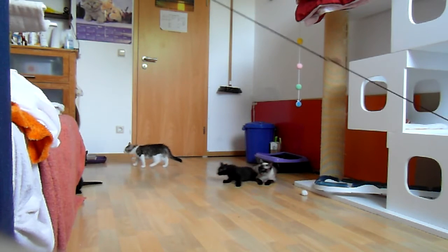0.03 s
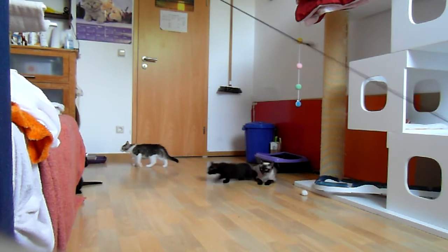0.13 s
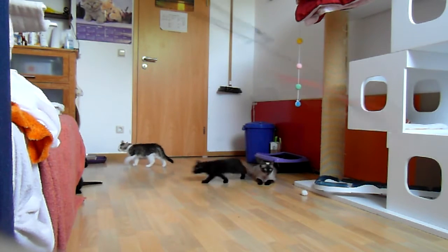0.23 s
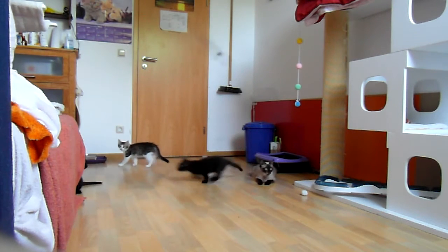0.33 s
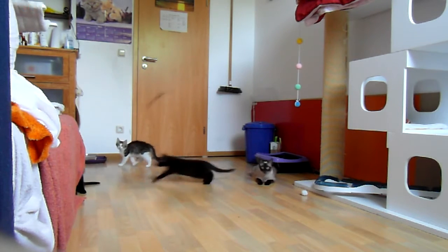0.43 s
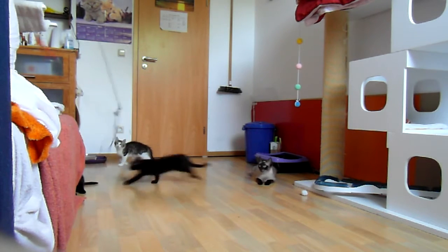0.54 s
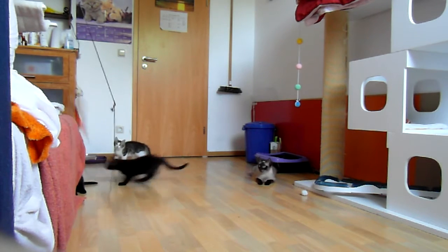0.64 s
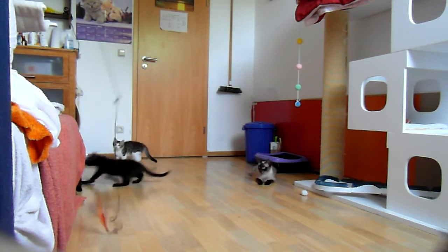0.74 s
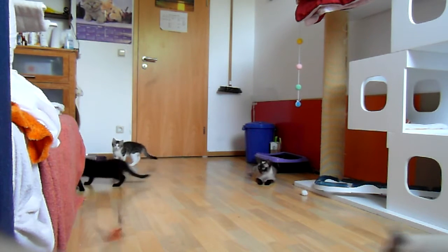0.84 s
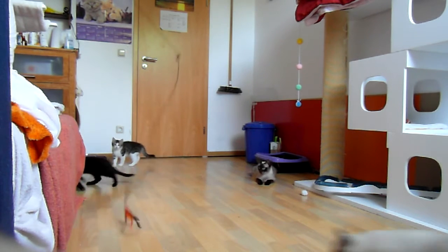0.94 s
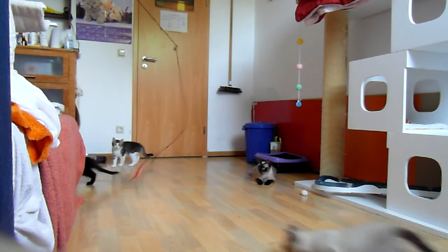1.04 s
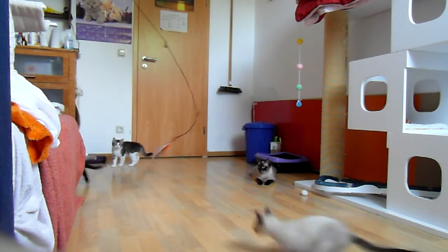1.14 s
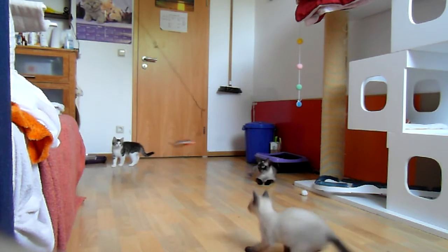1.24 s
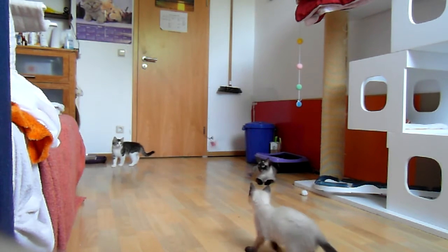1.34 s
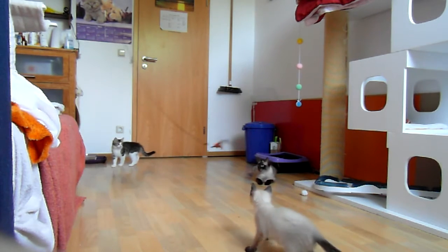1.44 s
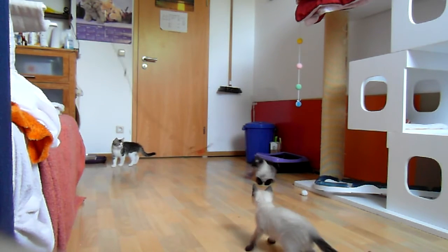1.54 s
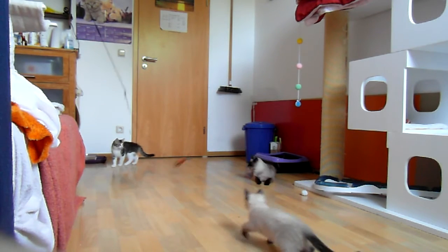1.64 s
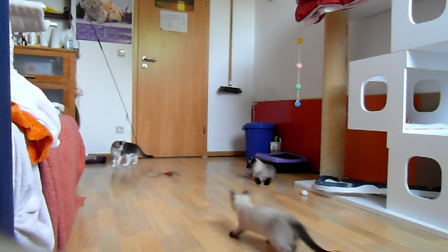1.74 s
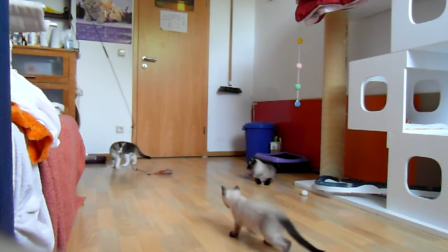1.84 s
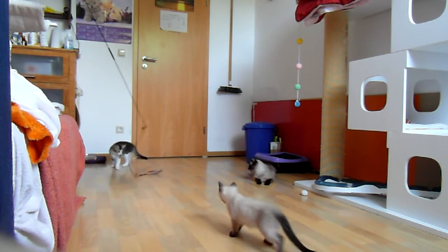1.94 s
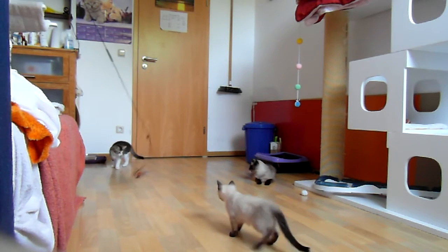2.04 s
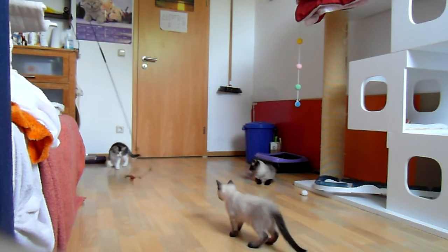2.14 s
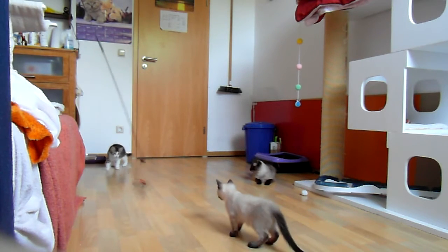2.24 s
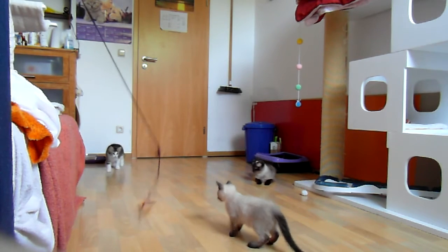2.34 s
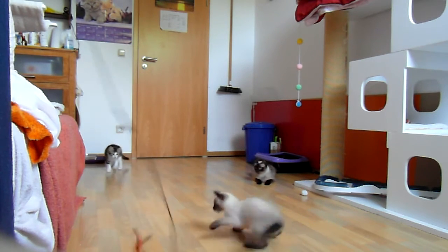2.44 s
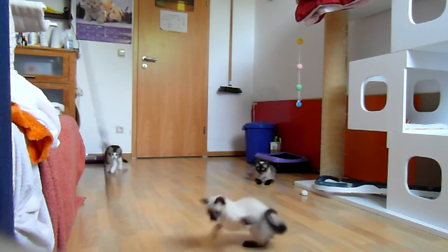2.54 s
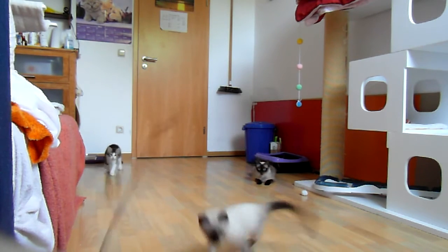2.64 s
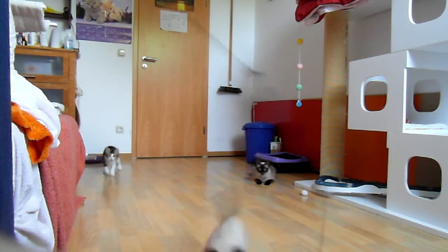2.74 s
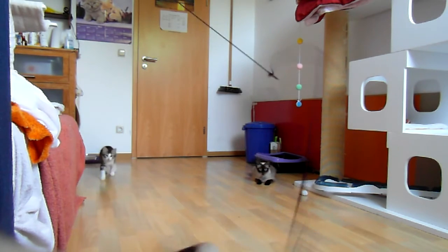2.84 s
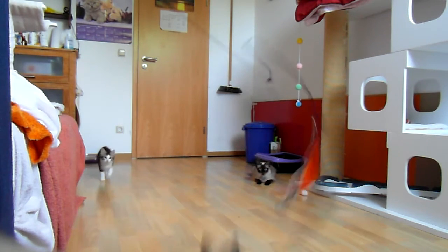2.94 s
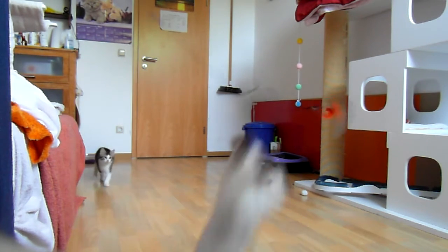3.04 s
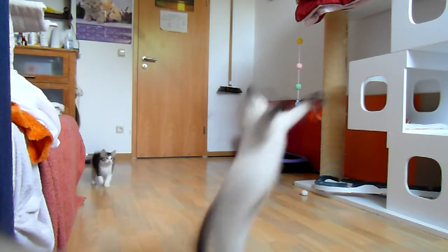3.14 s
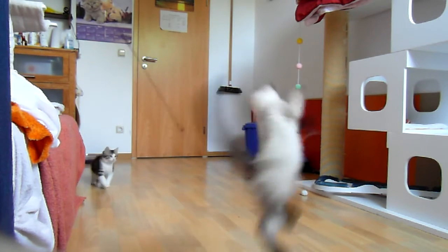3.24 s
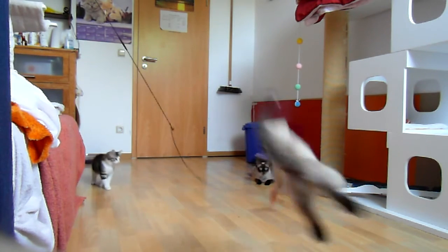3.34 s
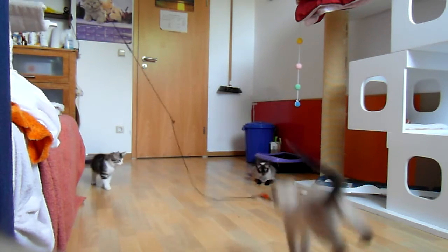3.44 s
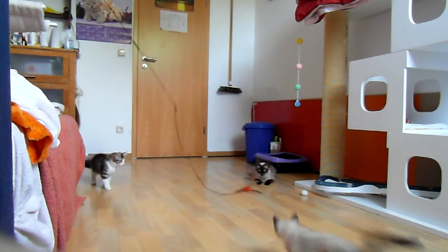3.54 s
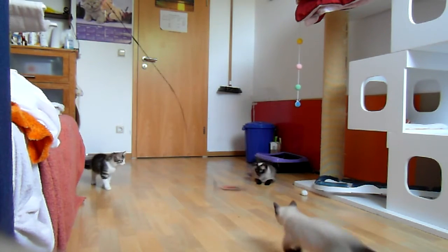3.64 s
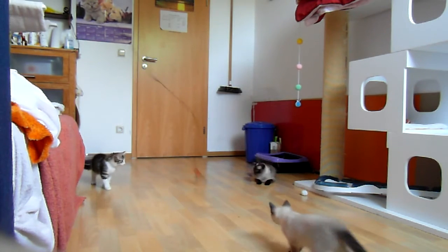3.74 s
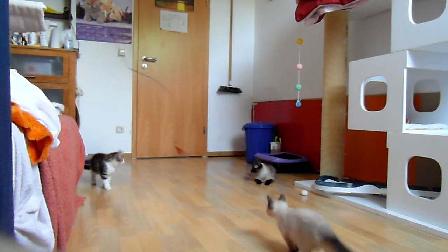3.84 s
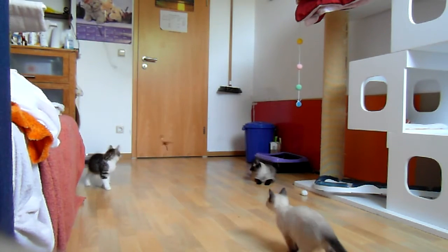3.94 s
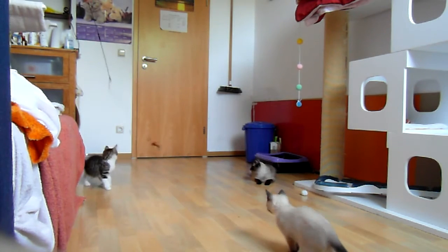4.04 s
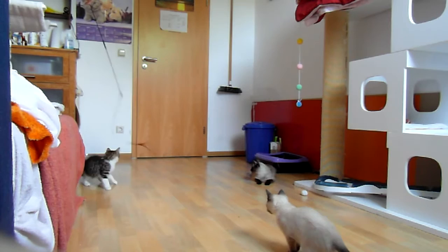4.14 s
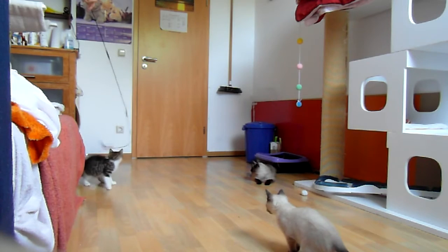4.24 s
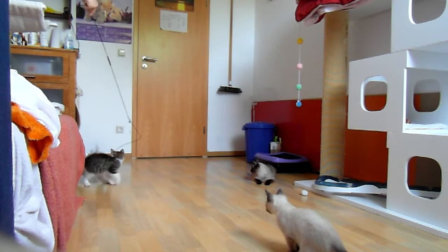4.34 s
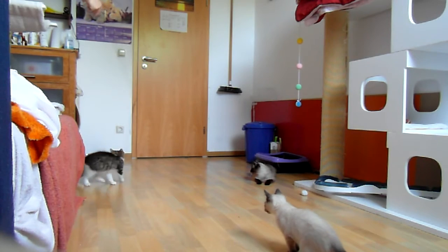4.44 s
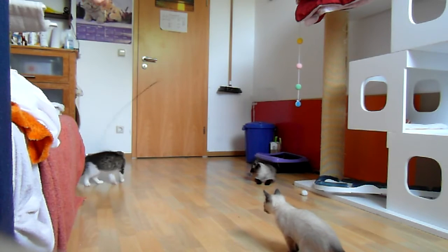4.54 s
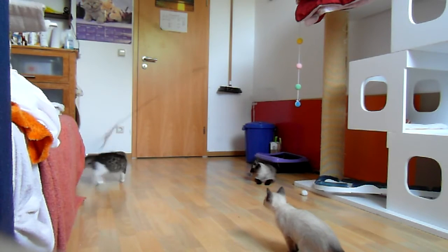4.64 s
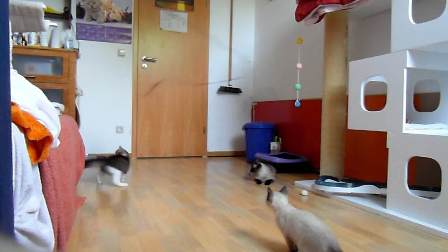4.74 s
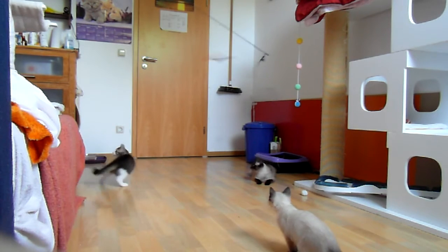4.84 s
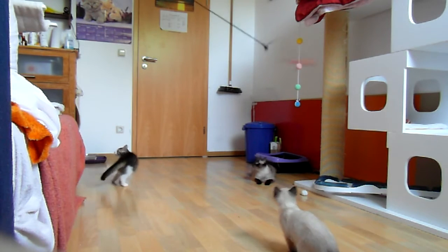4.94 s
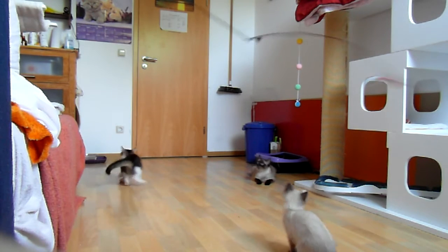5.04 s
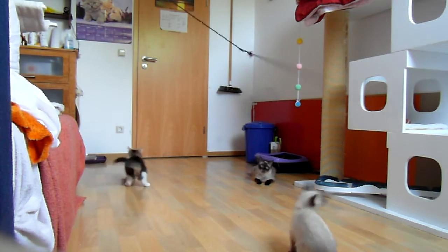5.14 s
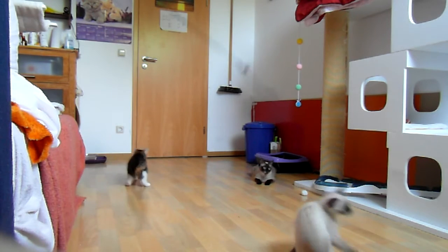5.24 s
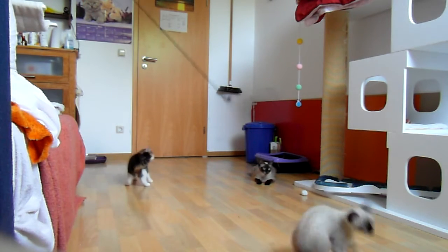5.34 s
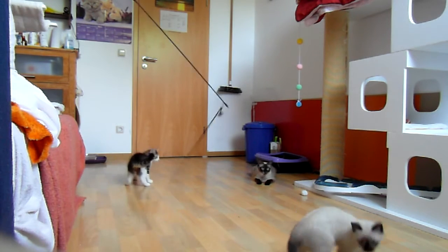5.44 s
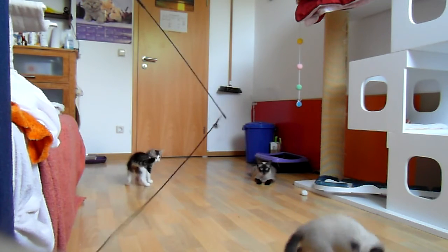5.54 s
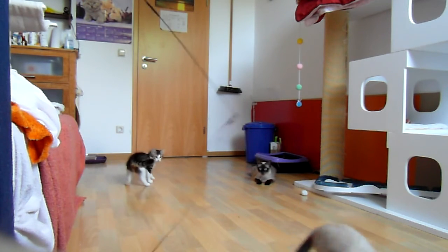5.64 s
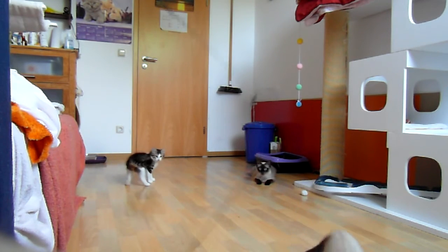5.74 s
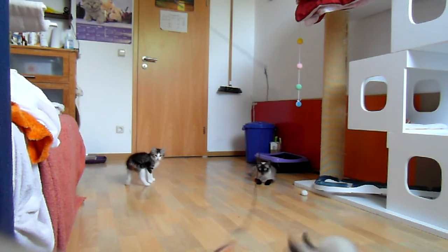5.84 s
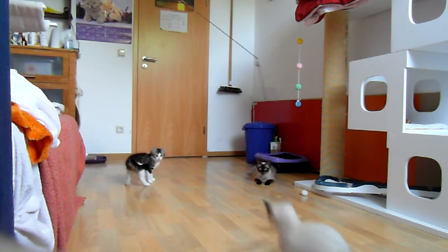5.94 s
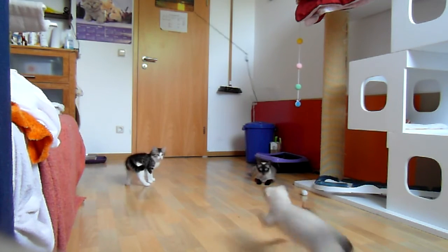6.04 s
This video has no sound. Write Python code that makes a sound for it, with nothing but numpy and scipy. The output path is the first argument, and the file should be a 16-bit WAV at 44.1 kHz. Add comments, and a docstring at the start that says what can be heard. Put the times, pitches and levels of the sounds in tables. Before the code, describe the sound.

Kittens thump, skid and tick their claws across a hollow laminate floor in a small room, with one hard landing over faint hiss.

```python
"""Kittens chase a feather toy over a floating laminate floor in a small furnished room, near a camera on the ground.
Microphone hiss, hum and rumble, made as filtered noise, lie under everything. First paws thump and slap the planks
and claws tick and skid, made as noise bursts ringing floor, plank and claw modes. Lighter steps follow, then near 3 s
the hardest slap and a run of heavy steps, near 3.6 s a skid and more thumps, then light contacts, ticks and rustles.
Towards the end the hum swells and a narrow drone rises. Decaying noise gives the room's reverberation."""
import sys
import numpy as np
from scipy import signal
from scipy.fft import rfft, irfft, next_fast_len
from scipy.io import wavfile
from scipy.ndimage import uniform_filter1d

SR = 44100
rng = np.random.default_rng(int(sys.argv[2]) if len(sys.argv) > 2 else 0)


def unload_audio(sound):
    """Save the sound as a 16-bit wav file, at the path given as the first command line argument."""
    columns = np.transpose(np.atleast_2d(sound))
    # keep every value between -1 and 1, then stretch to whole-number steps
    steps = np.round(np.clip(columns, -1, 1) * 32767)
    wavfile.write(sys.argv[1], SR, steps.astype(np.int16))


def natural_amplitude(level_db):
    """Convert a level in decibels to a linear amplitude factor, elementwise."""
    exponent = np.asarray(level_db, float) / 20
    return 10 ** exponent


N = 268304

# lower plank resonances: f/Hz, width/Hz, level/dB
PLANK = [(317, 200, -9), (416.6, 53, 0.5), (480.6, 41, -1), (583.3, 69.4, 1.5), (638, 116, 5),
         (725, 404, -0.5), (980, 99, 3), (1370, 165, -3)]
# upper plank resonances: f/Hz, width/Hz, level/dB of the response applied once
PLANK_TOP = [(1400, 250, -2), (1780, 380, 1), (2560, 380, -3), (3080, 480, -4), (4200, 900, -5)]
TOP_HZ = 11560  # upper band limit
PLANK_EVEN = 0.59  # exponent: plank, fizz, brushes and squeaks follow this power of the pressure


def unit(x):
    """Normalisation by effective value: scaled to rms 1."""
    return x / np.sqrt(np.mean(x ** 2) + 1e-20)


def peaked(x, db):
    """Normalisation by crest: scaled to a peak level in dB."""
    return natural_amplitude(db) * x / np.abs(x).max()


def along(points, hz):
    """Interpolation of (Hz, value) points on a logarithmic frequency axis."""
    f, v = np.transpose(points)
    return np.interp(np.log(hz + 1), np.log(f + 1), v)


def filtered(x, response):
    """Linear filtering: the spectrum of x times a complex response of frequency."""
    m = next_fast_len(x.shape[-1] + 8192)
    spectrum = rfft(x, m) * response(np.fft.rfftfreq(m, 1 / SR))
    return irfft(spectrum, m)[..., :x.shape[-1]]


def band(x, low_hz, high_hz):
    """Band limitation: a steep causal band-pass."""
    sos = signal.butter(8, [low_hz, high_hz], "bandpass", fs=SR, output="sos")
    return signal.sosfilt(sos, x)


def modes(table):
    """Modal superposition: causal resonances (Hz, width, dB) summed with alternating sign."""
    def response(f):
        return sum((-1) ** k * natural_amplitude(db) * 1j * f * width / (centre ** 2 - f * f + 1j * f * width)
                   for k, (centre, width, db) in enumerate(table))
    return response


def twice(hz, width_hz):
    """Cascaded resonators: one resonance applied twice, for steep flanks."""
    return lambda f: modes([(hz, width_hz, 0)])(f) ** 2


def add(track, s, sound):
    """Superposition: mixes a sound in at a time in seconds."""
    part = track[round(s * SR):][:len(sound)]
    part += sound[:len(part)]


def blow(tail_s, push, fall):
    """Impact excitation: a short push and a noise tail held briefly, then cut off ever faster, as by a noise gate."""
    t = np.arange(SR // 3) / SR
    tail = rng.standard_normal(len(t)) * np.exp(-(t / max(tail_s, .005)) ** fall)
    return tail + push * np.exp(-((t - .001) / 0.00033) ** 2)  # the push has pad-contact length


def stroke(length_s):
    """Pressure of a sliding contact, which bites, builds and slides out, with a window for smooth ends."""
    peak_at = 0.24  # share of the stroke
    bite_db, fade_db, fade_bend = -9, -26, 1.49  # first contact and end re peak; exponent of the fade
    u = np.arange(0, length_s, 1 / SR) / length_s
    rise = np.maximum(1 - u / peak_at, 0)
    fall = np.maximum((u - peak_at) / (1 - peak_at), 0)
    press = natural_amplitude(bite_db * rise + fade_db * fall ** fade_bend)
    return press, signal.windows.tukey(len(u), .1)


def drone():
    """Narrow-band noise, nearly tonal: two resonances whose level grows exponentially and emerges late."""
    level_db, at_s, db_per_s = -67.5, 6.18, 16  # the level that the rise would reach at at_s
    lines = lambda f: twice(515, width_hz=25)(f) + 0.25 * twice(630, width_hz=25)(f)
    swell = natural_amplitude(level_db + db_per_s * (np.arange(N) / SR - at_s))
    return swell * unit(filtered(rng.standard_normal(N), lines))


def room_tone(low, bright):
    """Modal room excitation: distant household hum and rumble, stirred by the paws, over partly coherent hiss."""
    # swelling of the hum: t/s, level/dB (rms, before stirring and left-right balance)
    hum_swell = [(0, -73), (.7, -75), (2.4, -73), (3.6, -72), (4.5, -69.5), (5.3, -70), (6.08, -66)]
    # hum resonances: f/Hz, width/Hz, level/dB
    hum_modes = [(519, 44, 1), (634, 67, 0), (1017, 97, 2), (1382, 69, -4.5), (1770, 350, -7.5)]
    # room modes of the rumble: f/Hz, width/Hz, level/dB, all of the response before it is squared
    room_modes = [(44.4, 12, -1), (84.2, 13, 1.5), (112.9, 17.6, 5), (162, 50, 1.5)]
    # shape of the hiss spectrum: f/Hz, relative level per Hz/dB
    hiss_shape = [(18, -35), (30, -12), (70, -3.5), (155, -7.5), (193, -2), (281, -4), (450, -2),
                  (563, -4.5), (973, -6), (1520, -6), (11400, -11), (14800, -99), (22000, -120)]
    # left-right correlation of the hiss: f/Hz, likeness (negative values count as 0)
    likeness = [(60, 0.74), (170, 0.65), (490, 0.4), (1410, 0.2), (4020, 0.34), (11500, -0.37)]
    rumble_db, hiss_db = -79, -68
    stir_t60_s, stir_hum_db, stir_rumble_db = 0.31, -35.5, -26  # stirring: decay time, levels re the paws

    keep = 10 ** (-6 / (stir_t60_s * SR))  # share of power kept per sample
    stir = lambda x: np.sqrt(np.abs(signal.lfilter([1 - keep], [1, -keep], x ** 2)))
    s, hum_db = np.transpose(hum_swell)
    hum_level = natural_amplitude(np.interp(np.arange(N) / SR, s, hum_db)) + natural_amplitude(stir_hum_db) * stir(bright)
    hum = hum_level * unit(filtered(rng.standard_normal(N), modes(hum_modes)))
    rumble_level = natural_amplitude(rumble_db) + natural_amplitude(stir_rumble_db) * stir(low)
    rumble = rumble_level * unit(filtered(rng.standard_normal(N), lambda f: modes(room_modes)(f) ** 2))

    # sharing noise power between mid and side sets the correlation of the two ports
    turn = lambda hz: np.arccos(np.clip(along(likeness, hz), 0, 1)) / 2
    shares = lambda hz: natural_amplitude(along(hiss_shape, hz)) * [np.cos(turn(hz)), np.sin(turn(hz))]
    mid, side = filtered(rng.standard_normal((2, N)), shares)
    hiss = natural_amplitude(hiss_db) * np.array([mid + side, mid - side]) / np.std(mid)
    return hiss + (hum + rumble + drone()) * natural_amplitude([[.4], [-.4]])  # balance in dB


def walls(x):
    """Reverberation: each frequency of the tail decays at its own speed; the ports hear nearly the same tail."""
    # reverberation time: f/Hz, t60/s
    decay = [(100, 0.19), (500, 0.2), (2000, 0.11), (10000, 0.066)]
    hz, t, z = signal.stft(rng.standard_normal((2, SR // 2)), SR, nperseg=256)
    fading = z * natural_amplitude(-60 * t / along(decay, hz)[:, None])
    mid, side = signal.istft(fading, SR, nperseg=256)[1]
    tail = np.array([mid + 0.072 * side, mid - 0.53 * side]) / np.linalg.norm(mid)
    delayed = np.pad(x, (300, 0))  # samples
    return signal.fftconvolve(delayed[None], tail, axes=1)[:, :N]


def brushes():
    """Distributed friction: pads and fur rustle as wide noise around a centre, with a little of the plank."""
    # brushing contacts: t/s, length/s, level/dB (rustle rms at full pressure), centre f/Hz
    rubs = [(0.143, 0.063, -60.5, 5500), (0.336, 0.056, -57, 2600), (0.528, 0.053, -59.5, 3500),
            (.565, .12, -56.5, 4740), (0.978, 0.041, -50.5, 6950), (3.599, 0.074, -53, 2000),
            (4.634, 0.059, -63.5, 5210), (4.708, 0.078, -66.5, 4500), (5.625, 0.11, -63.5, 3500),
            (5.756, 0.086, -64, 2500)]
    out = np.zeros(N)
    for s, length_s, db, hz in rubs:
        press, ends = stroke(length_s)
        # slow level fluctuation, 2.5 dB rms
        hairs = natural_amplitude(2.5 * unit(uniform_filter1d(rng.standard_normal(len(ends)), size=200)))
        rustle = unit(filtered(hairs * rng.standard_normal(len(ends)), modes([(hz, 1.47 * hz, 0)])))
        plank = natural_amplitude(-11.5) * unit(filtered(rng.standard_normal(len(ends)), modes(PLANK)))
        add(out, s, natural_amplitude(db) * ends * press ** PLANK_EVEN * (rustle + plank))
    return out


def squeaks():
    """Resonant friction: a sliding claw excites a single plank mode, heard as a narrow, rough tone."""
    # squeaking slides: t/s, length/s, level/dB (rms at full pressure), f/Hz
    slides = [(0.356, 0.11, -57.5, 2490), (0.411, 0.077, -51, 603), (0.536, 0.052, -61, 2660),
              (3.606, 0.11, -52, 1777), (3.61, 0.078, -56, 990), (5.146, .085, -59, 990),
              (5.652, .065, -54, 532), (5.754, 0.059, -58.5, 1340)]
    out = np.zeros(N)
    for s, length_s, db, hz in slides:
        press, ends = stroke(length_s)
        tone = unit(filtered(rng.standard_normal(len(ends)), twice(hz, width_hz=0.1 * hz)))
        add(out, s, natural_amplitude(db) * ends * press ** PLANK_EVEN * tone)
    return out


def skids():
    """Stick-slip friction: claws catch and slip in dense grains that excite the claw, the plank and the varnish."""
    # skids: t/s, length/s, level/dB (scrape rms at full pressure), scrape low edge f/Hz, plank drone re scrape/dB
    scrapes = [(.353, 0.1385, -45, 3520, -2), (.986, 0.11, -47, 3500, -13.5),
               (1.928, 0.0997, -46.5, 3880, -8), (3.598, 0.1, -42.5, 3800, -6)]
    grind_db, fizz_db = -13, -22  # re scrape
    drone_hz = 560.5  # sets the band of the plank drone
    out = np.zeros(N)
    for s, length_s, db, low_hz, drone_db in scrapes:
        press, ends = stroke(length_s)
        high_hz = 663 / length_s  # upper edge of the scrape band; shorter skids reach higher here
        # slow level fluctuation, 1.6 dB rms
        catches = natural_amplitude(1.6 * unit(uniform_filter1d(rng.standard_normal(len(ends)), size=150)))
        grains = lambda: catches * rng.standard_normal(len(ends))
        claw_mode = modes([(0.99 * np.sqrt(low_hz * high_hz), 0.42 * low_hz, 0)])
        claw = unit(band(filtered(grains(), claw_mode), low_hz, high_hz))
        fizz = natural_amplitude(fizz_db) * unit(band(grains(), high_hz, TOP_HZ))
        ringing = band(filtered(grains(), modes(PLANK)), 0.764 * drone_hz, 1.207 * drone_hz)
        upper = filtered(grains(), lambda f: 1.1 + modes(PLANK_TOP)(f) ** 2)
        grind = natural_amplitude(grind_db) * unit(band(upper, 720, 0.88 * low_hz))
        plank = natural_amplitude(drone_db) * unit(ringing) + grind
        add(out, s, natural_amplitude(db) * ends * (press * claw + press ** PLANK_EVEN * (plank + fizz)))
    return out


def ticks():
    """Short impact of a stiff claw tip: a click of a few milliseconds, broad around its own pitch."""
    # claw ticks: t/s, peak level of the pitched part/dB, f/Hz, sharp treble re that peak/dB
    taps = [(0.1395, -42, 2530, -12), (0.367, -44, 4140, -27), (0.3845, -47, 4230, -30),
            (0.5257, -38, 2700, -7.5), (0.5438, -47, 2530, -16), (0.5694, -47, 2870, -21),
            (0.589, -50, 5470, -14), (0.6072, -44.5, 4380, -16), (0.9824, -43, 4700, -15),
            (1.0011, -44, 4660, -25), (1.0242, -44, 4830, -26), (1.8403, -51, 2470, -20),
            (1.928, -41, 5100, -28), (2.5721, -54, 3250, -2), (2.676, -49, 3020, -5),
            (2.796, -49, 4940, -20), (3.6027, -51, 4150, -20), (4.6425, -50, 5300, -19),
            (5.1397, -51, 2470, -15), (5.6312, -45.5, 2820, -19), (5.653, -53, 2980, -3),
            (5.7585, -49.5, 2460, -9)]
    out = np.zeros(N)
    t = np.arange(SR // 40) / SR
    for s, db, hz, sharp_db in taps:
        click = rng.standard_normal(len(t)) * natural_amplitude(-60 * t / .012)
        add(out, s, peaked(filtered(click, twice(hz, width_hz=1.1 * hz)), db))
        add(out, s, peaked(band(click, 5900, TOP_HZ), db + sharp_db))
    return out


def knocks():
    """Modal excitation: all planks share modes; the landing point picks the strongest, a band limit the highest."""
    # contacts knocking the planks: t/s, peak level of the lower modes/dB, strongest f/Hz, upper band limit f/Hz,
    # upper modes re lower peak/dB
    slaps = [(0.144, -33.5, 593, 3000, -7), (0.163, -27, 565, 3030, -11), (0.367, -51.5, 617, 2870, -2),
             (0.524, -61, 630, 3400, 5), (0.599, -62, 1140, 2400, 6.5), (1.247, -59, 480, 1310, -20),
             (1.844, -51.5, 1040, 2240, -10), (2.025, -56, 980, 2500, -9), (2.629, -58.5, 520, 1500, -20),
             (2.954, -21, 620, 4720, -15.5), (3.002, -48, 610, 4770, -9), (3.096, -52, 479, 1230, -20),
             (3.125, -48, 460, 660, -20), (3.16, -53.5, 477, 700, -20), (3.697, -32.5, 413, 715, -20),
             (3.712, -28.5, 600, 693, -20), (3.728, -34.5, 410, 724, -20), (3.743, -36.5, 604, 680, -20),
             (3.786, -58, 624, 700, -20), (3.989, -55.5, 1090, 1480, -20), (4.03, -56.5, 520, 780, -20),
             (4.359, -60, 460, 2500, -11), (4.64, -58, 980, 2540, -20), (5.143, -52, 980, 3030, -8),
             (5.581, -72, 519, 1200, -20), (5.629, -51, 980, 2950, -3.5), (5.651, -49.5, 1000, 2200, -20),
             (5.655, -50, 513, 707, -20), (5.756, -54, 1330, 1650, -20)]
    out = np.zeros(N)
    top = lambda f: modes(PLANK_TOP)(f) * 1j * f / (1j * f + 1400)  # with a gentle high-pass
    notch = signal.butter(3, [2050, 2550], "bandstop", fs=SR, output="sos")
    for s, db, hz, reach_hz, top_db in slaps:
        # tails last longer at lower levels and band limits; 46 ms for a -30 dB knock limited to 2500 Hz
        tail_s = (.046 + .0012 * (-30 - db)) * (2500 / reach_hz) ** .25
        force = band(blow(tail_s, push=2.73, fall=1.49), 176, reach_hz)
        body = lambda f: modes(PLANK)(f) * (0.5 + modes([(hz, .2 * hz, 0)])(f))
        sound = peaked(filtered(force, body), db)
        if reach_hz > PLANK_TOP[1][0]:  # reaches the second upper mode
            burst = blow(0.98 * tail_s, push=2.5, fall=1.3)
            limited = band(burst, 1405, reach_hz) + natural_amplitude(-13) * burst  # a little noise is left above the limit
            sound += peaked(filtered(limited, top), db + top_db)
        if reach_hz > 4000:  # the hardest slaps have a notch at 2050-2550 Hz
            sound = signal.sosfilt(notch, sound)
        add(out, s - 3.55 / reach_hz, sound)  # offsets the band filter's delay, longer at low cut-offs
    return out


def thumps():
    """Low-frequency modal excitation: soft pads drive only the lowest floor modes, and the floor booms."""
    # paws landing: t/s, boom peak level/dB, boom f/Hz, deep boom re boom peak/dB, noise tail/s
    landings = [(0.141, -27.5, 155.3, -43, 0.08), (0.165, -41, 140, -30, 0.079),
                (0.361, -59, 150, -25, 0.04), (0.389, -46.5, 158.7, -33, 0.049),
                (0.422, -49.5, 128, -25, 0.045), (0.556, -57.5, 127, -28, 0.06),
                (0.609, -51.5, 144, -15, 0.054), (0.995, -58.5, 189, -8, 0.07),
                (1.249, -58, 152, -17, 0.12), (1.845, -60.5, 159, -9, 0.046),
                (1.874, -52.5, 121, -29, 0.05), (1.905, -49.5, 150, -25, 0.065),
                (2.027, -66.5, 172, -2.5, 0.13), (2.971, -29.5, 194.7, -42, 0.059),
                (3.048, -47, 138, -16, 0.08), (3.12, -41, 127, -24, 0.12), (3.192, -38, 161, -9.5, 0.043),
                (3.228, -39, 144, -9, 0.062), (3.257, -51, 144, -3.5, 0.094),
                (3.706, -35.5, 151, -35, 0.12), (3.765, -46, 145, -14, 0.11), (4.018, -53, 155, -5, 0.043),
                (4.364, -64.5, 150, -17, 0.088), (4.731, -61, 145, -32, 0.089),
                (4.94, -59, 148, -17, 0.052), (4.98, -55.5, 147, -20, 0.05), (5.144, -58, 142, -7, 0.05),
                (5.173, -50, 132.4, -18, 0.09), (5.234, -60, 124, -15, 0.054), (5.628, -63, 171, -5, 0.047),
                (5.832, -65, 149, -19, 0.055)]
    out = np.zeros(N)
    for s, db, hz, deep_db, tail_s in landings:
        force = blow(tail_s, push=2.6, fall=2.9)
        add(out, s - .004, peaked(filtered(force, twice(hz, width_hz=42.2)), db))
        add(out, s, peaked(filtered(force, twice(78.4, width_hz=16.4)), db + deep_db))
        add(out, s, peaked(filtered(force, twice(28, width_hz=17)), db - 33.5))  # the whole floor heaves
    return out


def scene():
    """Level and time differences: the paws are a little louder in the left port, which hears them a moment later."""
    low = thumps()
    bright = knocks() + ticks() + skids() + brushes() + squeaks()
    direct = low * natural_amplitude([[.6], [-.6]]) + bright * natural_amplitude([[1.2], [-1.2]])  # balance in dB
    # 40 microseconds of delay, its phase held at 1.4 rad in the treble
    lag = lambda hz: np.exp(-1j * np.minimum(2 * np.pi * hz * 40e-6, 1.4))
    direct[0] = filtered(direct[0], lag)
    return direct + natural_amplitude(-12.5) * walls(low + bright) + room_tone(low, bright)


def low_pass(x):
    """Removes everything above the highest recorded frequency."""
    return signal.sosfilt(signal.butter(12, 12110, fs=SR, output="sos"), x)


def record(dry):
    """Band limitation: the camera keeps nothing above its upper limit."""
    finished = filtered(dry, lambda hz: hz < TOP_HZ)
    return low_pass(finished)


dry = scene()
out = record(dry)
unload_audio(out)
```